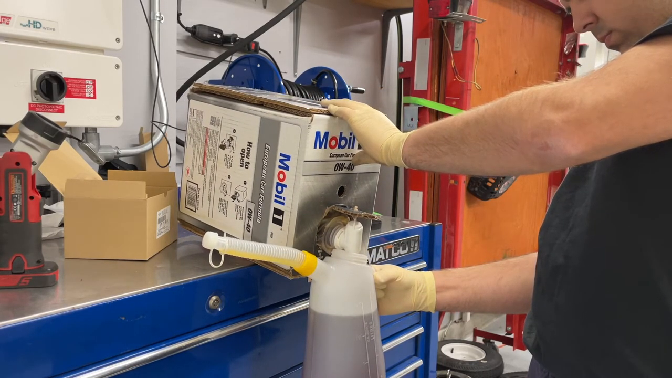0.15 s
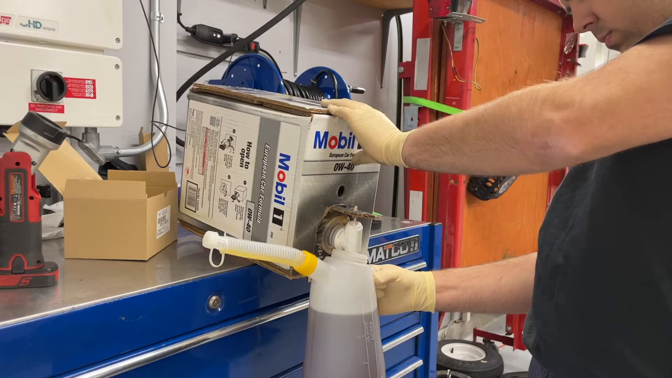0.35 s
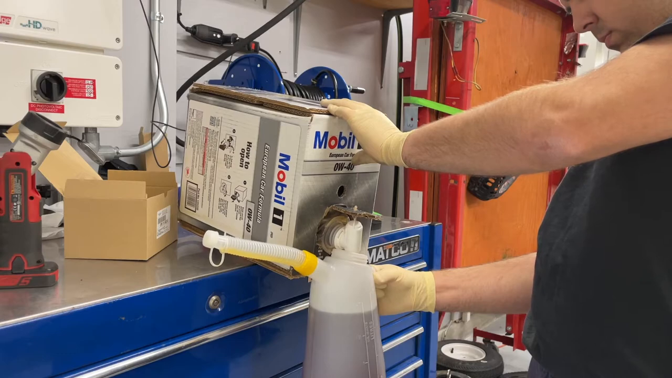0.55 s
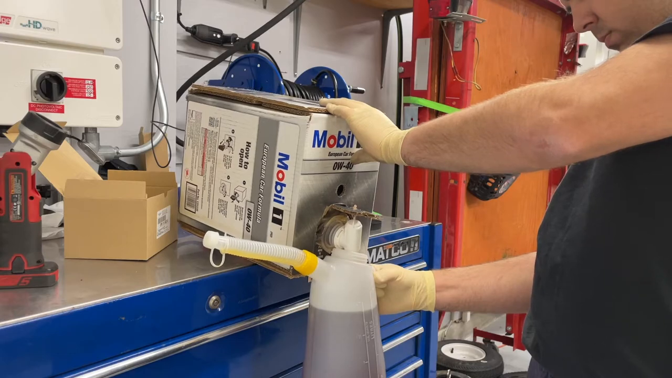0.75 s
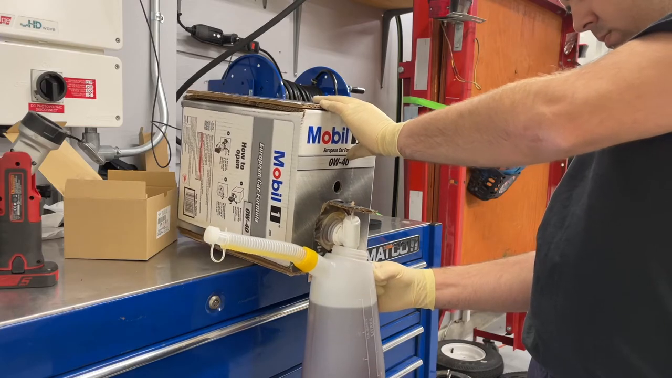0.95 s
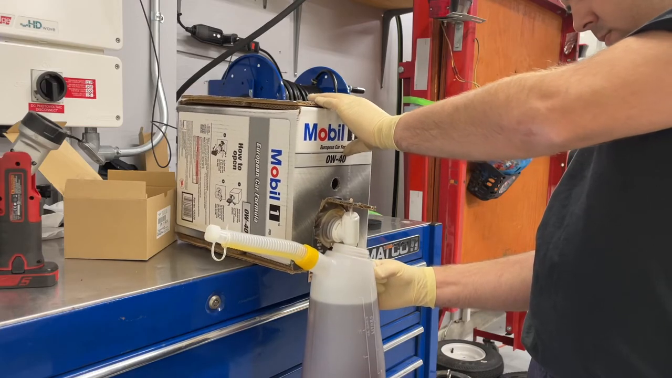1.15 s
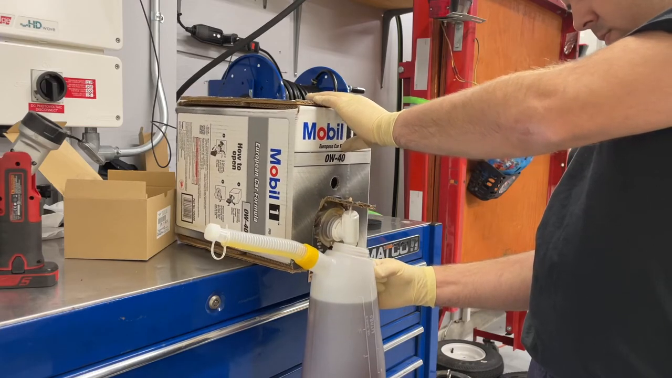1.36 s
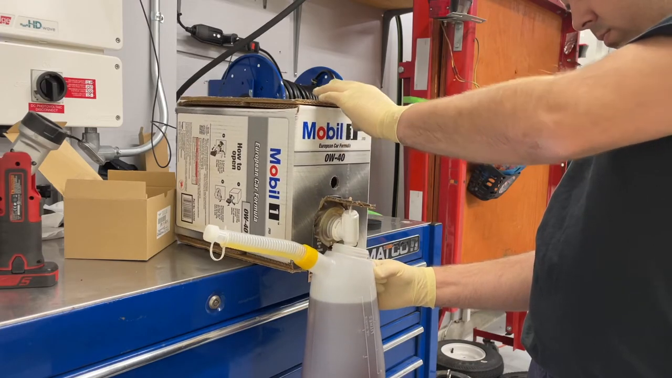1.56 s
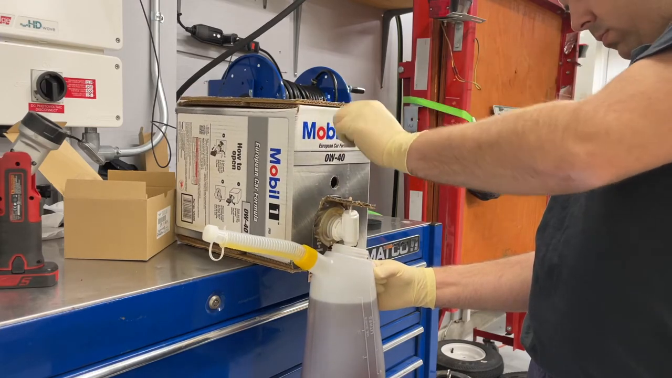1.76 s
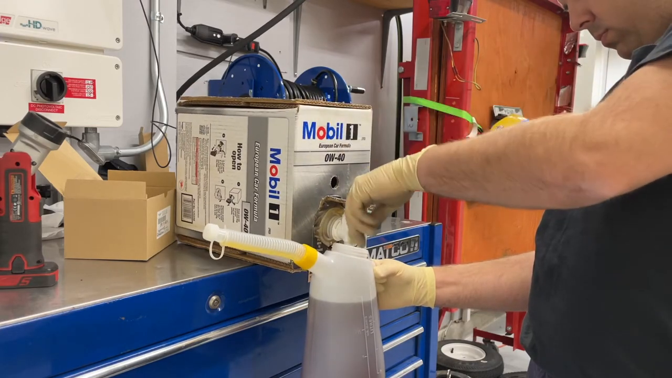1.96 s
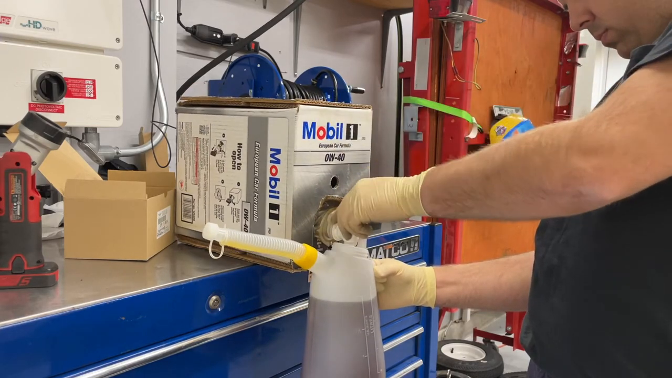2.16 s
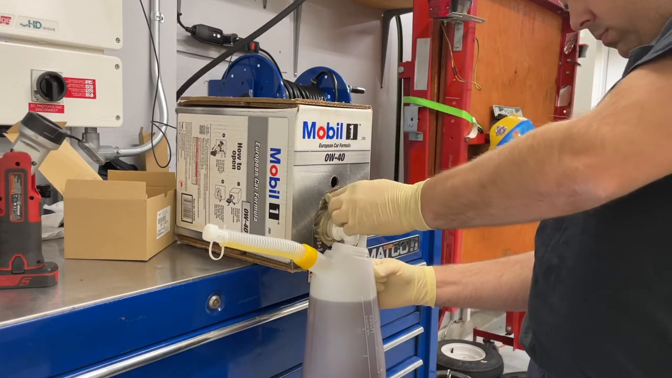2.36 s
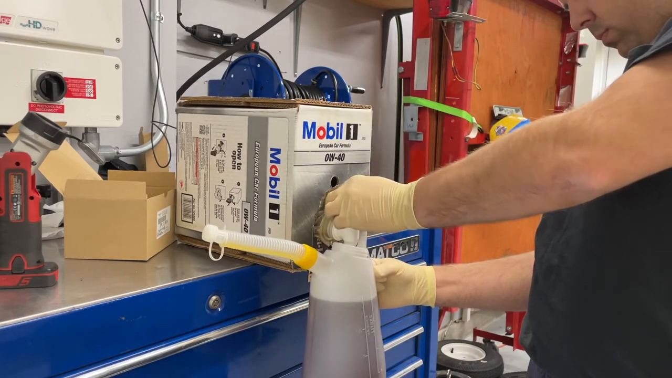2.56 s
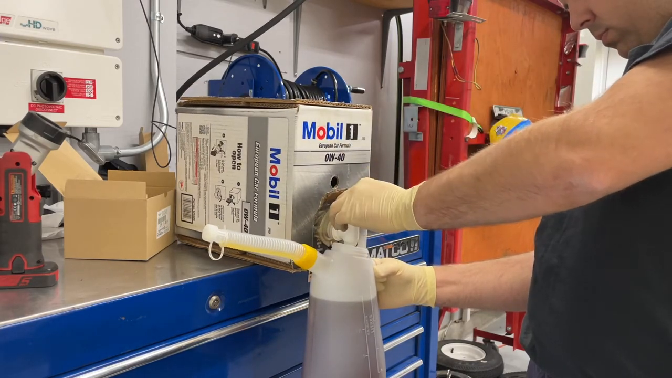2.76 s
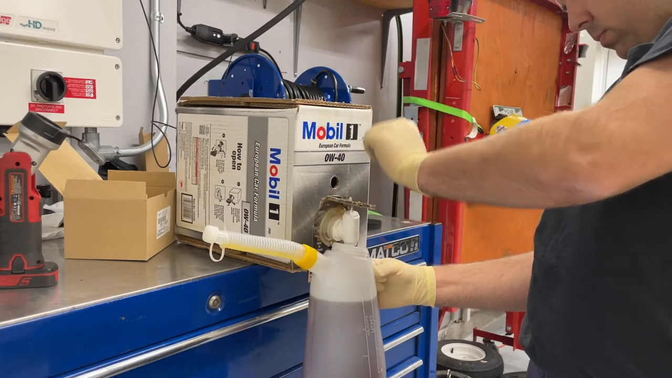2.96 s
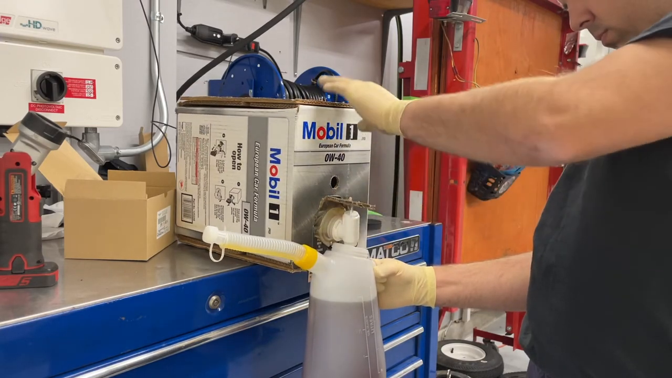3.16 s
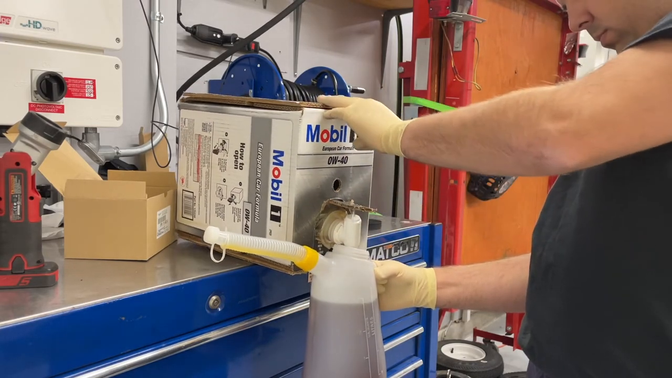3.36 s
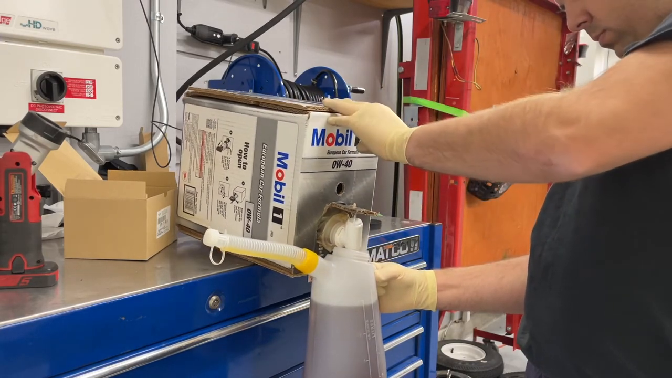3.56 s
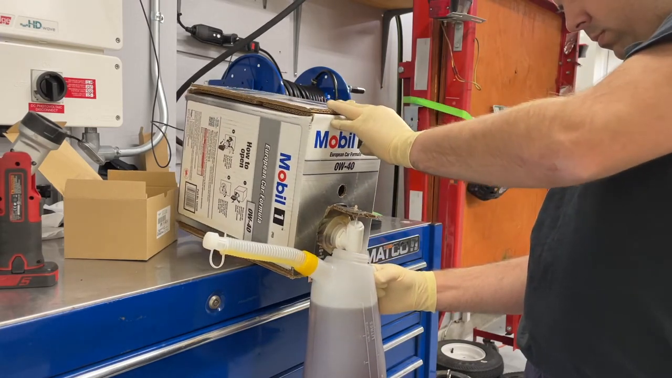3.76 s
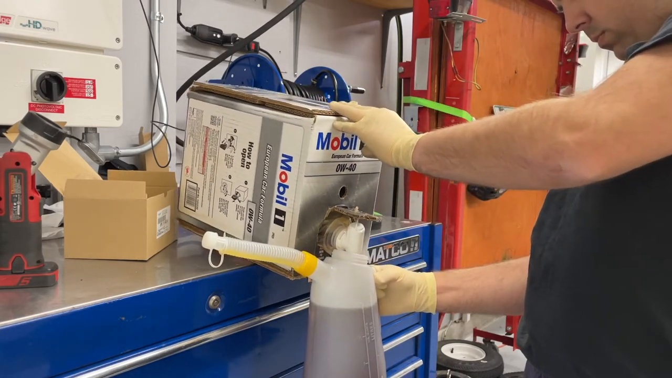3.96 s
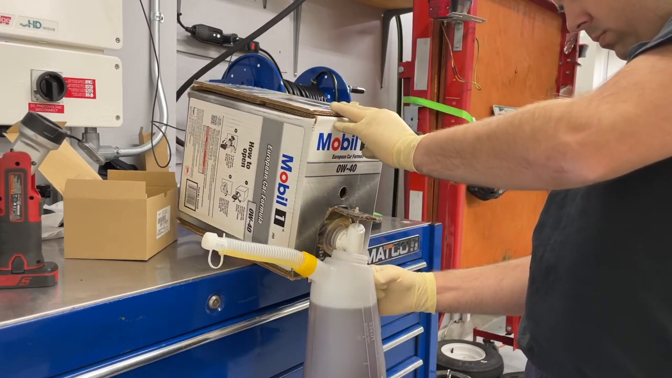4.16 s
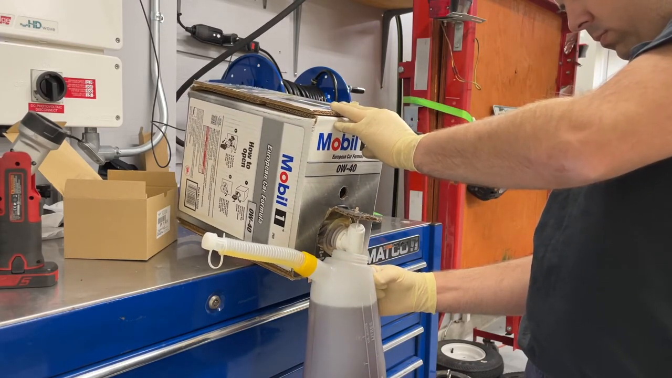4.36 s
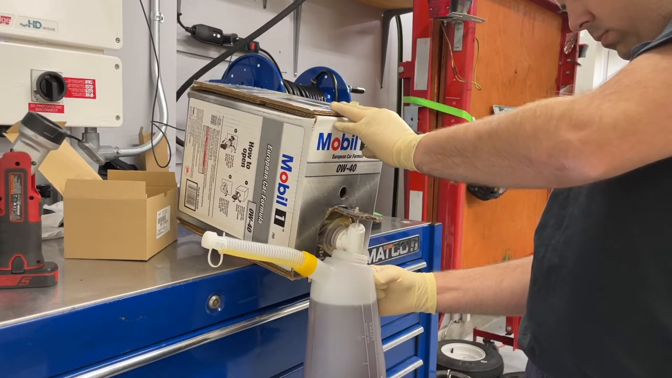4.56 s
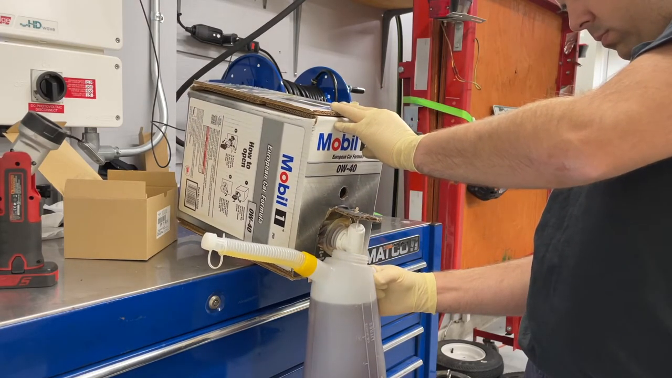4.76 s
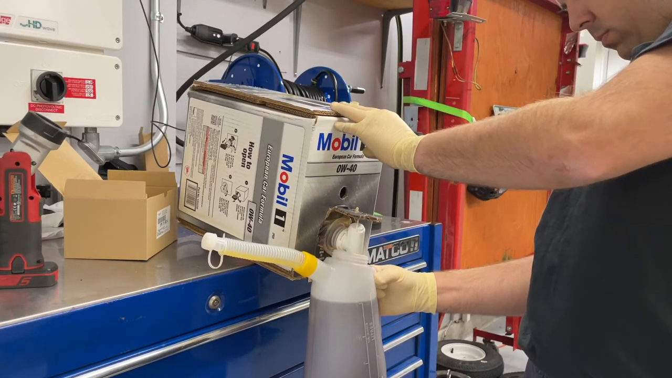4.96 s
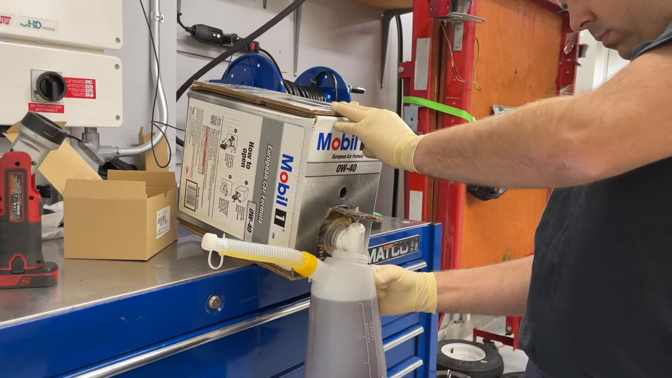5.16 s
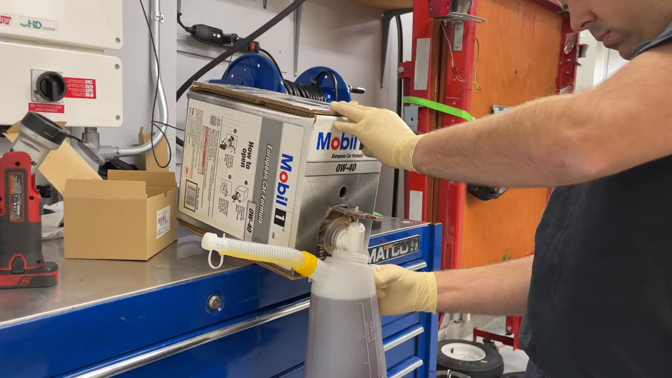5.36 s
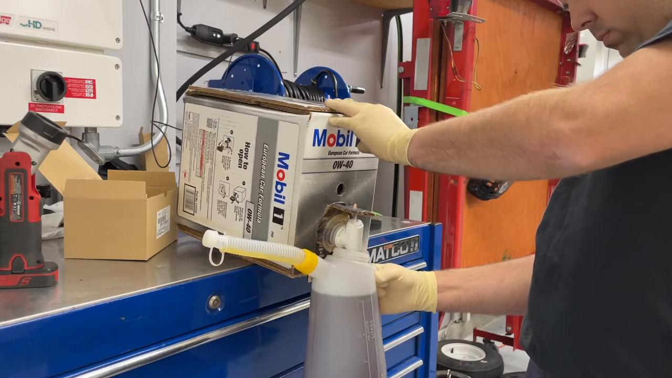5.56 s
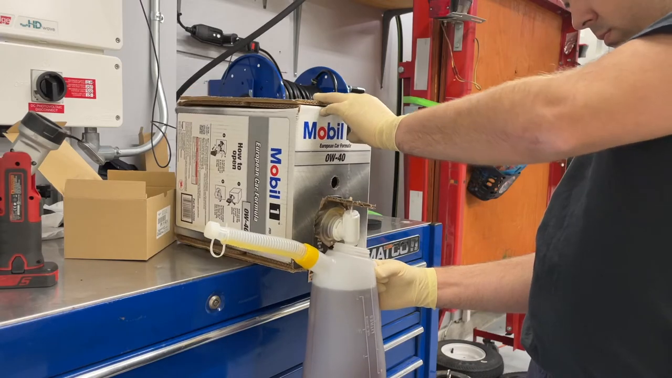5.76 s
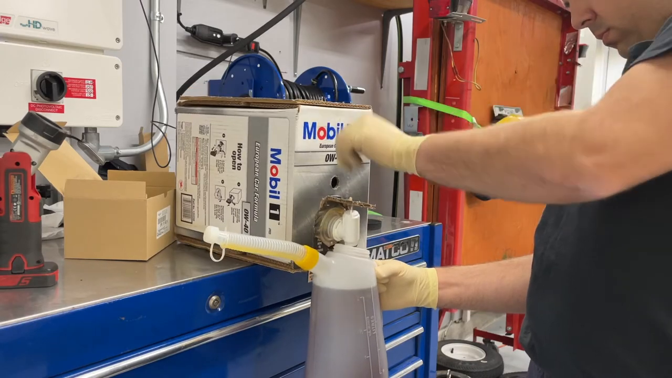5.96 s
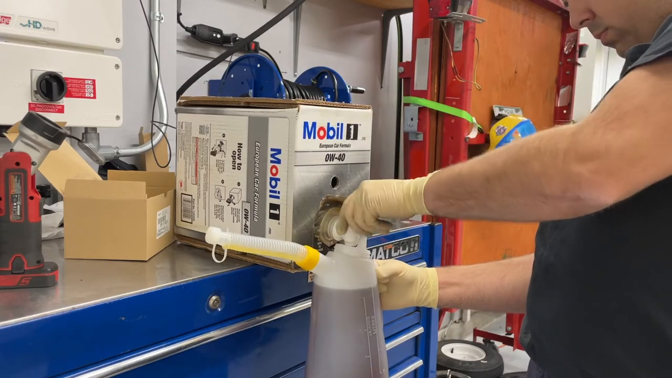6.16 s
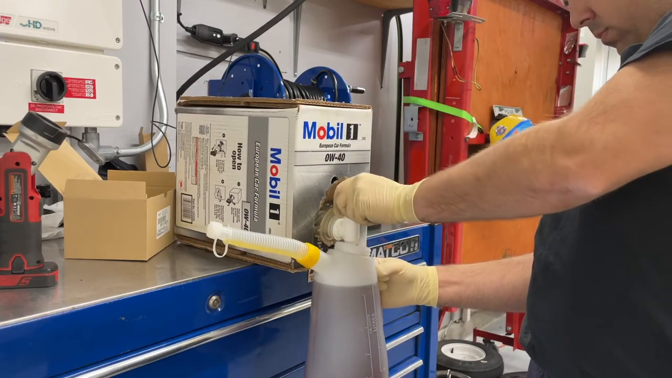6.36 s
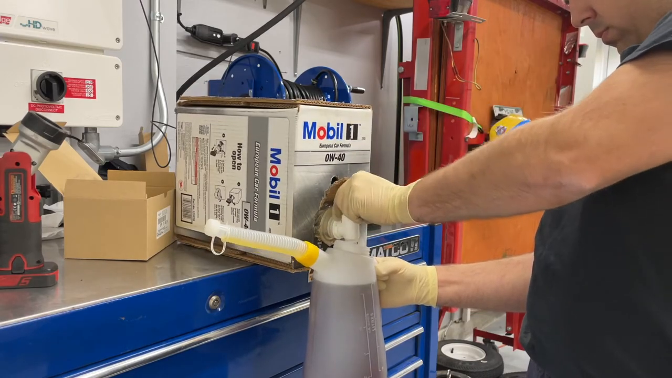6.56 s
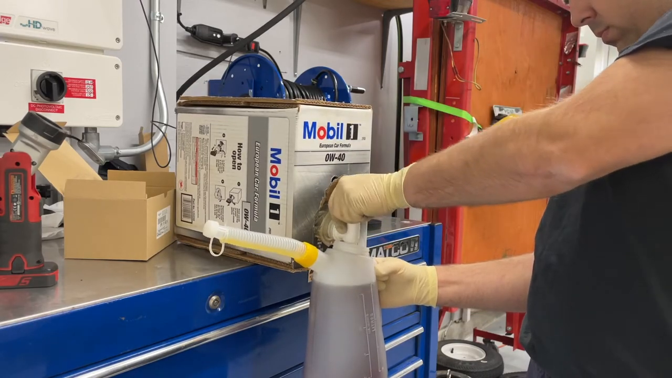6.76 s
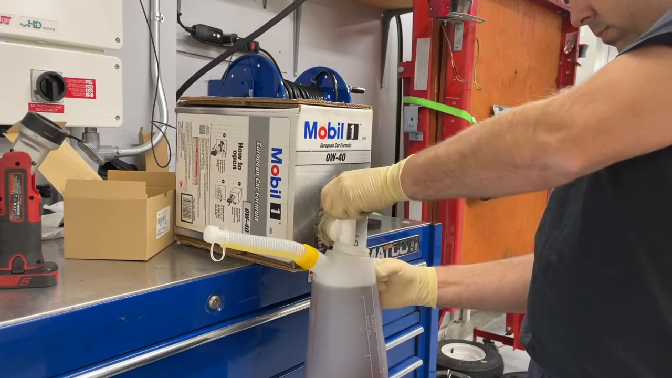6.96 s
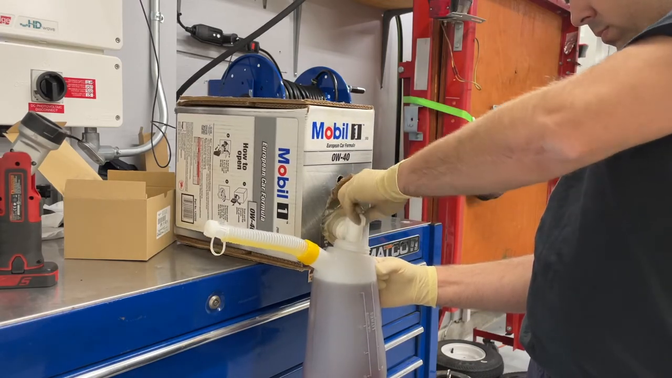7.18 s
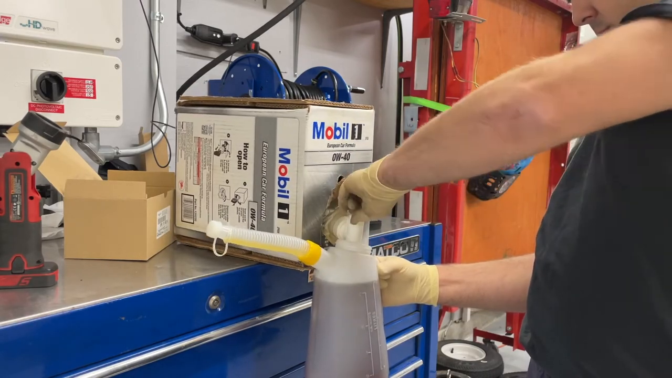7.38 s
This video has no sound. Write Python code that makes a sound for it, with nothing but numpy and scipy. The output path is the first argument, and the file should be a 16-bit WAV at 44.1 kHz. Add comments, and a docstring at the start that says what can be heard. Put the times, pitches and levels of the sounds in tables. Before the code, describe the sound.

A quiet garage with soft, bassy ventilation rumble, heard close in stereo with about half a second of room echo. From 0 to 1.1 s thick oil murmurs almost inaudibly in a plastic jug, with faint low bubbles around 0.3 to 0.8 s and a tiny pop at 1.0. Crisp rubber glove ticks come at 1.2 to 1.45, then a flap chatter and dull cardboard bump at 1.6, with light rubbing to 2.7. At 2.87 the spigot snaps over in rapid clicks and the jug rings hollowly; dull knocks follow at 3.2 and 3.4. A second gentle murmur runs from 3.3 to 5.7, with a small pop at 3.9. Glove ticks and knocks return at 5.7 to 6.2. From 6.4 the low drone swells, and heavy soft knocks, rasping rubber and scuffs crowd together, with cap clicks at 6.6 and a sharper one at 6.9, rubbing on to 7.4.

```python
"""Motor oil runs almost silently from a bag-in-box into a plastic jug on a garage workbench, over a ventilation rumble.
First the oil murmurs and a few bubbles ring in it; a rubber glove ticks, strokes the box and knocks it dully.
The spigot then snaps over and sets the jug ringing, and a second pour murmurs. Near the end the low drone swells,
while knocks, rubbing and clicks of the spigot's cap come thick. Noise makes rubs, murmur and air; sines make the rings."""
import sys
import numpy as np
from scipy import signal
from scipy.fft import rfft, irfft
from scipy.io import wavfile
from scipy.ndimage import uniform_filter1d

SR = 44100
rng = np.random.default_rng(int(sys.argv[2]) if len(sys.argv) > 2 else 0)


def dump(signal):
    """Clip the signal to [-1, 1] and save it as 16-bit WAV at the path in sys.argv[1]."""
    limited = np.clip(np.atleast_2d(signal).T, -1, 1)
    pcm = np.round(limited * 32767).astype(np.int16)
    wavfile.write(sys.argv[1], SR, pcm)


N = 327222
TIME = np.arange(N) / SR
EDGES = 30 * 2 ** np.arange(0, 9.6, .5)   # edges of half-octave bands, in Hz


def from_db(db):
    """Turn decibels into a gain."""
    return 10 ** (np.asarray(db) / 20)


def rms_one(x):
    """Scale a sound to rms 1."""
    return x / np.sqrt(np.mean(x ** 2) + 1e-20)


def at_hz(points, hz):
    """Read a table between its points, with pitch spaced in octaves."""
    freqs, values = np.transpose(points)
    return np.interp(np.log(hz), np.log(freqs), values)


def gains(rows):
    """Turn the dB columns of a table into smoothed gains in time, silent outside it."""
    s, *columns = np.transpose(rows)
    levels = [np.interp(TIME, s, column, left=-140, right=-140) for column in columns]
    return [uniform_filter1d(from_db(level), size=500) for level in levels]


def band(x, low_hz, high_hz):
    """Keep only the part of a sound between two pitches."""
    limits = [low_hz, min(high_hz, .48 * SR)]
    return signal.sosfilt(signal.butter(2, limits, "band", fs=SR, output="sos"), x + 1e-18)


def drift(rate_hz):
    """Wander slowly by chance with spread 1: noise smoothed at a fortieth of the sample rate."""
    r = np.exp(-80 * np.pi * rate_hz / SR)
    # the first 2000 steps only let the smoothing settle
    slow = signal.lfilter([1], [1, -2 * r, r * r], rng.standard_normal(N // 40 + 2002))[2000:]
    return np.interp(np.arange(N) / 40, np.arange(len(slow)), rms_one(slow))


# how wide the stereo sound is: pitch_hz, side_minus_mid_db
WIDTH = [(60, -13), (250, -7), (650, 0), (1200, 0), (2200, -3), (5500, -4), (8200, -23.5), (10000, -18),
         (11500, -20)]
# which side is louder: pitch_hz, left_minus_right_db
BALANCE = [(120, -3), (350, -1), (1200, -0.1), (4500, 2), (9000, 0)]


def spread(mid, side, hz):
    """Make left and right of one band from what they share (mid) and what differs (side)."""
    width = from_db(at_hz(WIDTH, hz))
    sides = np.array([[1], [-1]])
    stereo = (mid + sides * width * side) / np.hypot(1, width)
    return stereo * from_db(sides * at_hz(BALANCE, hz) / 2)


def coloured(spectrum, white, patchy_db):
    """Shape two mid-side pairs of noise in half-octave bands that flicker a little; rms 1."""
    out = 0
    for k, (low, high) in enumerate(zip(EDGES, EDGES[1:])):
        hz = np.sqrt(low * high)
        level_db = at_hz(spectrum, hz) + patchy_db * drift(10.5)
        # the pairs take turns, so that neighbouring bands differ
        out = out + spread(*band(white[k % 2], low, high), hz) * from_db(level_db)
    return rms_one(out)


def resonant_noise(peaks):
    """Let noise ring in a few resonances; rms 1."""
    out = 0
    for hz, width, db in peaks:
        mid, side = band(rng.standard_normal((2, N)), hz - width / 2, hz + width / 2)
        out = out + from_db(db) * rms_one(spread(mid, side, hz))
    return rms_one(out)


def add(track, s, sound):
    """Mix a sound into a track from time s on."""
    start = int(s * SR)
    part = sound[..., :N - start]
    track[..., start:start + part.shape[-1]] += part


def struck(hits, modes, vary_db=0.5, detune=0.017):
    """Each sharp contact rings the modes of a small part, a little differently every time."""
    out, t = np.zeros(N), TIME[:SR // 8]
    for s, db in hits:
        for k, (hz, mode_db, t60) in enumerate(modes):
            strength, bend = rng.standard_normal(2)
            ring = np.sin(2 * np.pi * hz * (1 + detune * bend) * t) * (-1) ** k
            add(out, s, from_db(db + mode_db + vary_db * strength - 60 * t / t60) * ring)
    return out


# colour of the moving air: pitch_hz, relative_level_db
AIR_COLOUR = [(50, -24), (100, -2), (140, -8), (260, -16), (450, -22), (600, -20.5), (880, -22),
              (1250, -37.5), (2800, -43.5), (5800, -48), (11500, -54), (16000, -62)]
# resonances of the ventilation's rumble: pitch_hz, width_hz, relative_level_db
RUMBLE = [(43.6, 13, -9), (57.2, 7.3, -2.5), (80.7, 23, -5), (138, 98, -10)]
# rise and fall of the rumble, before rumble_db: time_s, relative_level_db
RUMBLE_LEVEL = [(0, -61), (3.2, -60), (3.7, -61.5), (5.2, -54.5), (5.5, -57.5), (6.2, -57.5), (7.42, -51)]
# the drone creeps up and then swells, before drone_db: time_s, relative_level_db
DRONE_LEVEL = [(0, -66), (3.7, -61), (5.4, -52), (6.2, -52.5), (6.5, -41), (7.42, -44.5)]


def shop(air_db=-64.5, rumble_db=3.5, drone_db=-5.0, drone_hz=107, whine_hz=5652, whine_db=-104.0):
    """Moving air and rumble are shaped noise, the drone is a wavering sine, the very faint whine narrow noise."""
    air = from_db(air_db) * coloured(AIR_COLOUR, rng.standard_normal((2, 2, N)), patchy_db=.8)
    rumble_level = np.interp(TIME, *np.transpose(RUMBLE_LEVEL)) + rumble_db
    rumble = from_db(rumble_level) * resonant_noise(RUMBLE)
    tone = np.sqrt(2) * np.sin(2 * np.pi * np.cumsum(drone_hz + 3.14 * drift(6.0)) / SR)
    drone_level = np.interp(TIME, *np.transpose(DRONE_LEVEL)) + drone_db + 1.8 * drift(23)
    drone = from_db(drone_level) * spread(tone, 0, drone_hz)
    whine = from_db(whine_db) * resonant_noise([(whine_hz, 30, 0)])
    return air + rumble + drone + whine


# how long echoes last in the garage: pitch_hz, time_to_fall_60_db_s
ROOM_T60 = [(150, 0.5), (500, 0.56), (1500, 0.51), (3500, 0.46), (7000, 0.52), (13000, 0.5)]
# how loud the echoes are: pitch_hz, echo_level_db
ROOM_DB = [(150, -11), (400, -3.5), (1000, -2.5), (2500, 6), (4000, 0.5), (6500, 0), (12000, -4)]


def garage(x):
    """Diffuse echoes build up within milliseconds and die away band by band."""
    t, response = TIME[:SR * 3 // 4], 0
    for low, high in zip(EDGES, EDGES[1:]):
        hz = np.sqrt(low * high)
        fade = from_db(-60 * t / at_hz(ROOM_T60, hz)) * (1 - np.exp(-t / 0.00078))
        tail = rms_one(spread(*band(rng.standard_normal((2, len(t))), low, high), hz) * fade)
        # a wider band carries a larger share of the echo
        share = np.sqrt(2 * (high - low) / SR / len(t))
        response = response + tail * from_db(at_hz(ROOM_DB, hz)) * share
    return signal.fftconvolve(np.broadcast_to(x, (2, N)), response, axes=1)[:, :N]


# oil running into the jug, one list a pour: time_s, level_db
POURS = [
    [(0, -76), (.45, -90), (.7, -76.5), (1.15, -98)],
    [(3.3, -70.5), (3.7, -68.5), (4.3, -71.5), (5.2, -69), (5.68, -61.5)],
]
# resonances of the hollow of the jug: pitch_hz, width_hz, relative_level_db
HOLLOW = [(256, 113, 1), (397, 36, -11), (485, 57, -15.5)]


def oil(waver_db=3.0):
    """The thick stream does not splash: it only makes the hollow of the jug murmur."""
    flow, = np.sum([gains(pour) for pour in POURS], axis=0)
    return flow * from_db(waver_db * drift(24)) * resonant_noise(HOLLOW)


# bubbles and glugs of air folded into the oil: start_s, level_db, pitch_hz
BUBBLES = [(0.336, -68, 268), (.655, -62.5, 492), (0.796, -64, 200), (0.832, -66.5, 397)]


def bubbles(cycles=5.6, rise=0.023):
    """Each bubble rings for a few cycles in the thick oil, rising slightly in pitch."""
    out, t = np.zeros(N), TIME[:SR // 4]
    for s, db, hz in BUBBLES:
        age = t * hz / cycles
        ring = np.sin(2 * np.pi * hz * t * (1 + rise * np.tanh(age)))
        add(out, s, from_db(db) * age * np.exp(1 - age) * ring)
    return out


# bubbles burst at the surface, before level_db of the function: start_s, relative_level_db, pitch_hz
POPS = [(1.039, -76, 2970), (3.883, -65.5, 2170), (3.885, -78, 4200)]


def pops(level_db=-5.0, decay_s=0.011, width=1.2):
    """The oily skin of a bubble tears with a tiny tick of fading noise."""
    out, t = np.zeros(N), TIME[:SR // 20]
    for (s, db, hz), grit in zip(POPS, rng.standard_normal((len(POPS), len(t)))):
        # the band reaches the ratio "width" to either side of the pitch
        tear = rms_one(band(grit, hz / width, hz * width))
        add(out, s, from_db(db + level_db) * tear * np.exp(-t / decay_s))
    return out


# taps of the top flap of the box: start_s, level_db
FLAP_TAPS = [(1.605, -48.5), (1.609, -50), (1.6135, -55)]
# ring of the flap: pitch_hz, relative_level_db, time_to_fall_60_db_s
FLAP = [(1095, -0.5, 0.023), (1480, -7, 0.022), (2520, -3.5, .014), (2890, 1.5, 0.019), (3580, 4, 0.011),
        (6600, 4.5, 0.0035)]


def flap():
    """The top flap of the box chatters as the hand lets go: each tap rings its short modes."""
    return struck(FLAP_TAPS, FLAP)


# clicks of the spigot's plastic cap: start_s, level_db
CAP_SNAPS = [(6.5812, -44), (6.8607, -40), (6.8785, -48.5), (6.888, -42), (6.8927, -32.5), (6.8938, -45)]
# ring of the cap: pitch_hz, relative_level_db, time_to_fall_60_db_s
CAP = [(1380, 2.5, 0.0038), (2810, 4.5, 0.0025), (4070, -3, 0.0058), (6360, -3.5, 0.0022),
       (11100, -7, 0.001)]


def cap():
    """The plastic cap clicks under the fingers: each snap rings its very short modes."""
    return struck(CAP_SNAPS, CAP)


# slips of the spigot as it snaps over: start_s, push_on_jug_db, click_db
SLIPS = [(2.8745, -38.5, -35.5), (2.8895, -45.5, -39), (2.9027, -34.5, -52), (2.917, -47, -43),
         (2.931, -57, -61)]
# ring of the valve in the spigot: pitch_hz, relative_level_db, time_to_fall_60_db_s
VALVE = [(1010, -12, 0.054), (1380, 0.5, 0.023), (1478, -1.5, 0.022), (1970, -9.5, 0.012),
         (4320, -2.5, 0.0073), (5100, -6, 0.011), (5500, -7, 0.0088)]
# ring of the jug: pitch_hz, relative_level_db, time_to_fall_60_db_s
JUG = [(165, -2, 0.11), (283, -6, 0.11), (309, -8, 0.1), (390.6, 6, 0.12), (410, -4, 0.11), (537, -6, 0.1),
       (635, -8, 0.1)]


def spigot(bend=0.0121, bend_rate_hz=14):
    """Each slip clicks in the valve and pushes the jug's low modes further; they bend as the hand squeezes its wall."""
    out, t = struck([(s, click_db) for s, _, click_db in SLIPS], VALVE), TIME[:SR // 2]
    for hz, mode_db, t60 in JUG:
        swing = np.zeros(N)
        for s, push_db, _ in SLIPS:
            level_db = push_db + mode_db + rng.normal(0, 1.0)
            add(swing, s, from_db(level_db - 60 * t / t60) * (1 - np.exp(-t * hz)))
        turn = 2 * np.pi * np.cumsum(hz * (1 + bend * drift(bend_rate_hz))) / SR
        out += swing * np.sin(turn)
    return out


def slip_burst(events, level_db=-9.5, crisp_db=8.5, broad_db=-5.5, ring_db=-0.5, creep_db=-9.5, grain_db=4.0):
    """A surface creeps, then lets go in a burst of tiny slips, heard in four bands of noise."""
    out, lead = np.zeros(N), .04   # the creep starts this many seconds early
    t = TIME[:SR // 8] - lead
    for s, db, hz, hollow_db, event_crisp_db, decay in events:
        sizes, *grit = rng.standard_normal((5, len(t)))
        # from_hz, to_hz, relative_level_db
        parts = [(950, 1800, hollow_db), (hz / np.sqrt(2), hz * np.sqrt(2), ring_db),
                 (2500, 7600, broad_db), (8000, 15500, event_crisp_db + crisp_db)]
        slips = np.where(t < 0, from_db(creep_db), 1) * np.exp(-np.abs(t) / decay)
        slips = slips * from_db(grain_db * rms_one(uniform_filter1d(sizes, size=40)))
        for white, (low, high, part_db) in zip(grit, parts):
            # narrow bands are lifted to make up for their width
            noise = band(white * slips, low, high) * np.sqrt(SR / 2 / abs(high - low))
            add(out, s - lead, from_db(db + level_db + part_db) * noise)
    return out


# the rubber glove comes unstuck: time_s, relative_level_db, decay_s
GLOVE_TICKS = [(1.233, -54.5, 0.0021), (1.3518, -56, 0.0016), (1.397, -65.5, 0.0099),
               (1.436, -47.5, 0.0014), (1.4482, -42.5, 0.0014), (5.7104, -57, 0.0034),
               (5.7447, -41.5, 0.0014), (5.8199, -55, 0.0077), (6.333, -54, 0.004), (6.405, -46, 0.0035)]


def glove_ticks(pitch_hz=6800, hollow_db=-16, crisp_db=-9):
    """Rubber lets go with a crisp tick, with little of the hollow band."""
    return slip_burst([(s, db, pitch_hz, hollow_db, crisp_db, decay) for s, db, decay in GLOVE_TICKS])


# cardboard and plastic scuff under the hand: time_s, relative_level_db, pitch_hz, hollow_part_db, decay_s
SCUFFS = [(1.6054, -42, 3850, -10.5, 0.0067), (1.624, -47.5, 3750, -17, 0.0075),
          (2.3513, -47, 3530, -6, 0.0076), (2.8747, -39.5, 4200, 6, 0.0055),
          (2.8898, -43.5, 4350, 5.5, 0.0036), (2.996, -52, 2360, -5, 0.0059),
          (3.189, -52, 3140, -1.5, 0.0077), (5.897, -50, 3100, -3, 0.0085),
          (6.1949, -45.5, 4400, -8, 0.0066), (6.391, -54.5, 4530, -2, .003),
          (6.4029, -42.5, 4180, -8, 0.0051), (6.41, -46, 4400, 2, 0.0019), (6.58, -45, 4030, 5, 0.0056),
          (6.59, -44, 2210, 9, 0.0025), (6.65, -44, 2360, -2, 0.0045), (6.658, -44, 5270, -3, 0.0044),
          (6.8945, -41, 3320, -6, 0.0024), (7.116, -41, 2100, 0, 0.0031)]


def scuffs(crisp_db=-17.5, crisp_loss=0.45):
    """Cardboard and plastic let go more hollowly; the hollower a scuff, the less crisp (dB per dB)."""
    return slip_burst([(s, db, hz, hollow_db, crisp_db - crisp_loss * hollow_db, decay)
                       for s, db, hz, hollow_db, decay in SCUFFS])


def grip(s, attack, release, curve=3):
    """A stroke tightens ever faster up to its firmest grip, then relaxes."""
    tighten = np.clip(1 + (TIME - s) / attack, 0, 1) ** curve
    return tighten * np.exp(-np.clip((TIME - s) / release, 0, 20))


# strokes of the glove over box and spigot:
# firmest_grip_s, friction_hiss_db, shudder_of_box_db, attack_s, release_s, rasp_pitch_hz
STROKES = [(1.53, -69.5, -66.5, 0.23, 0.058, 3850), (1.68, -67.5, -58, 0.18, 0.14, 3344),
           (2.24, -74.5, -55.5, 0.22, 0.12, 4115), (2.555, -70, -60.5, 0.037, 0.4, 3750),
           (2.78, -72, -62, 0.4, 0.045, 4400), (2.871, -53, -50, 0.15, 0.023, 4500),
           (2.93, -66.5, -53, 0.034, .06, 2997), (3.45, -81, -55, 0.1, 0.036, 2975),
           (5.742, -70.5, -55, 0.178, 0.081, 4520), (5.895, -63, -59.5, 0.25, 0.1, 3022),
           (6.212, -65, -46.5, 0.28, 0.028, 4420), (6.333, -63, -51.5, 0.029, 0.94, 4540),
           (6.438, -60, -40, 0.19, 0.032, 4647), (6.654, -54.5, -38.5, 0.22, 0.1, 4300),
           (6.919, -55, -63, 0.06, 0.16, 2500), (7.11, -51.5, -45.5, 0.72, 0.15, 5183),
           (7.34, -60, -46.5, 0.27, 0.12, 3477)]


def strokes():
    """Add up the power of all strokes; give the gains in time of hiss and shudder."""
    return np.sqrt(sum((from_db([[hiss_db], [shudder_db]]) * grip(s, attack, release)) ** 2
                       for s, hiss_db, shudder_db, attack, release, _ in STROKES))


# bands in which the rubber rasps: multiple_of_stroke_pitch, level_against_hiss_db
RASP_PARTIALS = [(1, -10), (1.599, -12)]


def rasp(judder_db=3.5, judder_rate_hz=50, wander=0.027, damped_db=-61.0, width_hz=410):
    """Dragging rubber rasps in narrow bands that glide from stroke to stroke; a firm grip damps them."""
    powers = np.array([(from_db(db) * grip(s, attack, release)) ** 2
                       for s, db, _, attack, release, _ in STROKES]) + 1e-20
    # the strongest stroke of the moment counts most for the pitch
    stroke_hz = [hz for *_, hz in STROKES] * np.ones((N, 1))
    pitch = np.average(stroke_hz, axis=1, weights=powers.T) * (1 + wander * drift(8))
    turn = 2 * np.pi * np.cumsum(pitch) / SR
    hiss, out = np.sqrt(powers.sum(axis=0)), 0
    narrow = signal.butter(2, width_hz / 2, fs=SR, output="sos")
    for ratio, db in RASP_PARTIALS:
        a, b = signal.sosfilt(narrow, rng.standard_normal((2, 2, N)))
        # slow noise is carried up to the gliding pitch
        mid, side = a * np.cos(ratio * turn) + b * np.sin(ratio * turn)
        out = out + from_db(db) * rms_one(spread(mid, side, ratio * pitch.mean()))
    return out * from_db(judder_db * drift(judder_rate_hz)) * hiss / (1 + hiss / from_db(damped_db))


# colour of a firm rub: pitch_hz, relative_level_db
RUB_COLOUR = [(200, -44), (450, -2.5), (850, -3), (1500, -13.5), (2200, -15.5), (3000, -16), (4500, -14.5),
              (6800, -17.5), (12500, -24.5), (16000, -31)]
# resonances of the panels of the box: pitch_hz, width_hz, relative_level_db
BOX = [(212, 80, -1), (278, 35, -1), (337, 65, -8), (404, 36.4, -2)]


def glove(grain_db=2.0, grains_per_s=2800, firm_db=-78.5, light_hz=3200):
    """Rubber sticks and slips in dense grains; pressed harder, it sounds fuller and shakes the panels of the box."""
    hiss, shudder = strokes()
    shape = (2, 2, N)
    sizes = from_db(grain_db * np.minimum(rng.exponential(1, shape), 4)) * rng.choice([-1, 1], shape)
    grains = sizes * (rng.random(shape) < grains_per_s / SR)
    firm = coloured(RUB_COLOUR, grains, patchy_db=3.0)
    # a light touch mostly stirs the treble
    light = signal.sosfilt(signal.butter(1, light_hz, "high", fs=SR, output="sos"), firm)
    pressure = hiss / (hiss + from_db(firm_db))
    friction = hiss * (pressure * firm + (1 - pressure) * light)
    return friction + shudder * resonant_noise(BOX)


# dull knocks of box and spigot: start_s, relative_level_db, middle_pitch_hz, scuff_db, time_to_give_way_s
KNOCKS = [(1.604, -52, 365, -15, 0.0087), (1.626, -40, 160, -24, 0.0097), (1.65, -41, 149, -27, 0.0071),
          (2.351, -53, 322, -16, 0.0083), (2.874, -27, 278, -28, 0.0065), (2.903, -31, 340, -15.5, 0.0051),
          (2.928, -31, 384.5, -20.5, 0.015), (3.186, -30.5, 308, -24, 0.0069),
          (3.192, -30.5, 175, -44, 0.01), (3.232, -43, 216, -18.5, 0.0094), (3.385, -42.5, 248, -25, 0.007),
          (3.408, -49, 386, -22, 0.015), (5.711, -50.5, 814, 5.5, 0.0034),
          (5.716, -35.5, 253, -15.5, 0.0075), (5.893, -45.5, 297, -16.5, 0.0057),
          (6.153, -39.5, 280, -33.5, 0.0059), (6.187, -33.5, 305, -16.5, 0.01),
          (6.192, -31, 406.5, -32, 0.0088), (6.395, -25, 312, -21.5, 0.006),
          (6.407, -23, 211, -24.5, 0.0069), (6.444, -32, 236, -38, 0.0071),
          (6.582, -23.5, 323, -17, 0.0057), (6.592, -25.5, 381, -28, 0.0051),
          (6.621, -36.5, 253, -18, 0.011), (6.657, -22, 199, -30, 0.008), (6.8925, -38.5, 333, -4, 0.007),
          (6.986, -39.5, 288, -10.5, 0.0055)]


def knocks(level_db=-3.0, sag=0.039, scuff_low_hz=390, scuff_top_hz=1000, sway_ratio=0.71, sway_db=-5.0):
    """Cardboard gives way softly: a few cycles swell and die over the slower sway of the box, with a little scuff."""
    out, t = np.zeros(N), TIME[:SR // 6]
    for (s, db, hz, scuff_db, swell), grit in zip(KNOCKS, rng.standard_normal((len(KNOCKS), len(t)))):
        age = t / swell
        # the pitch sags from just above its middle to just below
        pitch = hz * (1 + sag * (2 * np.exp(-age / 2) - 1))
        turn = 2 * np.pi * np.cumsum(pitch) / SR
        flex = np.sin(turn) + from_db(sway_db) * np.sin(sway_ratio * turn)
        # filtered twice for steeper edges
        rough = band(band(grit, scuff_low_hz, scuff_top_hz), scuff_low_hz, scuff_top_hz)
        scuff = from_db(scuff_db) * rms_one(rough)
        add(out, s, from_db(db + level_db) * (age * np.exp(1 - age)) ** 2 * (flex + scuff))
    return out


def from_bench(x, left_db=-3.0, shade_hz=700):
    """Bring the direct sound to the microphone's two ports: the right one hears more bass."""
    bass = signal.sosfilt(signal.butter(1, shade_hz, fs=SR, output="sos"), x)
    return x + (from_db([[left_db / 2], [-left_db / 2]]) - 1) * bass


def scene(rub_echo_db=-7.0, snap_echo_db=-4.5):
    """Handling at the bench, in the hum of the shop; bubbles and pops stay shut in the jug, without echo."""
    bodies = knocks() + spigot() + flap() + glove_ticks() + scuffs()
    snaps = cap()
    rubbing = glove() + rasp()
    to_walls = bodies + from_db(rub_echo_db) * rubbing.mean(axis=0) + from_db(snap_echo_db) * snaps
    direct = from_bench(bodies + snaps + bubbles() + pops())
    return direct + rubbing + garage(to_walls) + oil() + shop()


# phase between the microphone's channels, opposed in two treble bands: pitch_hz, left_lead_radians
PORT_PHASE = [(100, .05), (2800, .55), (5200, .7), (7000, -1.1), (7750, -2.9), (8700, -3.35),
              (10500, -6.28), (12700, -6.28), (14200, -9.42)]


def record(dry, cutoff_hz=15900):
    """The microphone turns the phase of one channel against the other; the top is cut steeply."""
    lead = np.interp(np.linspace(0, SR / 2, N // 2 + 1), *np.transpose(PORT_PHASE))
    left = irfft(rfft(dry[0]) * np.exp(1j * lead), N)
    ports = np.array([left, dry[1]])
    return signal.sosfilt(signal.ellip(10, .2, 70, cutoff_hz, fs=SR, output="sos"), ports)


dry = scene()
out = record(dry)
dump(out)
```